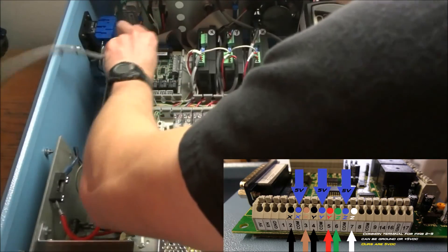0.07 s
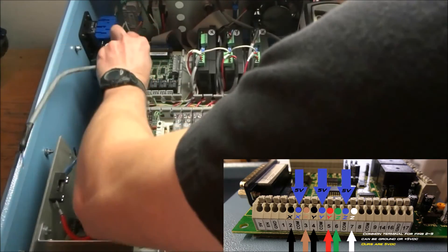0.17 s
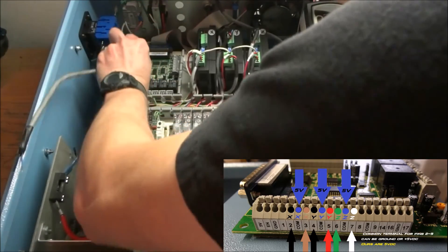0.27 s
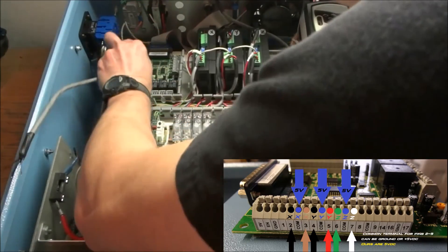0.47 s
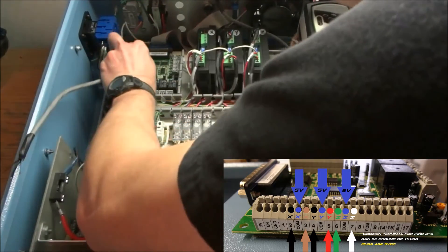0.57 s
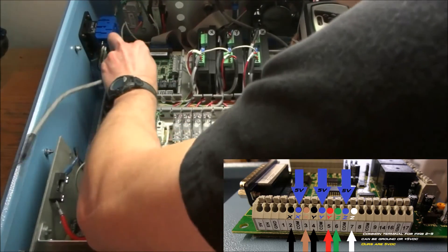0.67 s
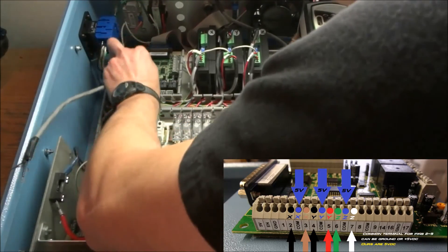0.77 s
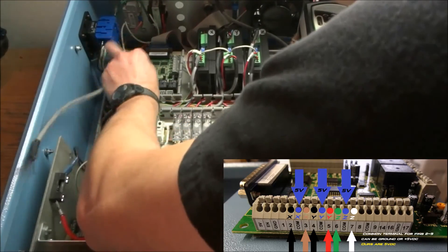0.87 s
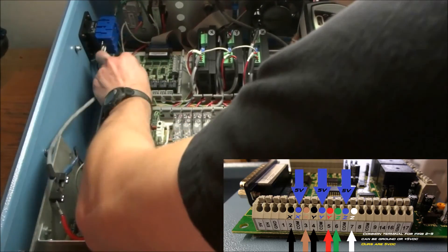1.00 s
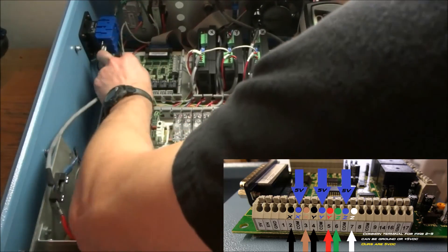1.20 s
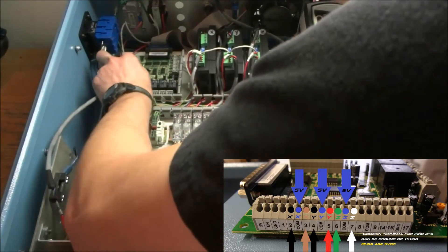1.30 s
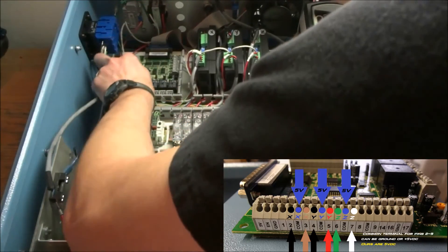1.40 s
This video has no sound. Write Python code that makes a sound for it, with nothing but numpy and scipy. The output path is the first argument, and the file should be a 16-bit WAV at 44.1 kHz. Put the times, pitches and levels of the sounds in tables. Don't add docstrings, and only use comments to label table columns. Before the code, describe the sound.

Metallic handling knocks inside a steel case: a brief scrape into a rattling slap, a pause, a single ringing knock, a sharp clicking snap, then small wire ticks, recorded close in a quiet, slightly reverberant room.

```python
import sys
import numpy as np
from scipy import signal
from scipy.fft import rfft, irfft, next_fast_len
from scipy.io import wavfile
from scipy.ndimage import map_coordinates

SR = 44100
rng = np.random.default_rng(int(sys.argv[2]) if len(sys.argv) > 2 else 0)


def int16_out(signal):
    q = np.round(np.clip(np.atleast_2d(signal).T, -1, 1) * 32767)
    wavfile.write(sys.argv[1], SR, q.astype(np.int16))


def nominal_scale(level):
    x = np.asarray(level, float) / 20
    return 10 ** x


N = 63945

LOW_HZ, HIGH_HZ = 1500, 7000
SIDE_DB, AIR_SIDE_DB = -17, -13

# (frequency [Hz], level [dB])
PRESSED_COLOUR = [(90, -30), (250, 3.5), (600, 2), (1000, -5), (1500, -11.5), (2500, -2.5), (7500, -8),
                  (11000, 8), (15500, -2.5)]
# (frequency [Hz], level [dB])
RAIL_COLOUR = [(90, -11), (300, -1), (700, 5.5), (1200, 6.5), (1600, 4.5), (2300, 8), (4700, 7),
               (8000, -11.5), (15500, -33)]


def unit(x):
    return x / np.sqrt(np.mean(x ** 2) + 1e-30)


def along(points, hz):
    f, v = np.transpose(points)
    return np.interp(np.log(hz + 1), np.log(f + 1), v)


def over_time(rows):
    return np.interp(np.arange(N) / SR, *np.transpose(rows))


def filtered(x, response):
    m = next_fast_len(x.shape[-1] + 8192)
    spectrum = rfft(x, m) * response(np.fft.rfftfreq(m, 1 / SR))
    return irfft(spectrum, m)[..., :x.shape[-1]]


def wobble(rate):
    knots = rng.standard_normal(int(N * rate / SR) + 4)
    return map_coordinates(knots, [np.arange(N) * rate / SR])


def noise(spectrum, side_db):
    closed = [(0.83, -120)] + list(spectrum) + [(spectrum[-1][0] * 2.5, -120)]
    mid, side = filtered(rng.standard_normal((2, N)), lambda hz: nominal_scale(along(closed, hz)))
    side = nominal_scale(side_db) * side
    return unit(np.array([mid + side, mid - side]))


def workshop():
    # (frequency [Hz], density [dB per Hz])
    air_colour = [(12, -10), (20, -9), (33, -4), (310, -11), (367, -9.5), (1440, -24.5), (1570, -20.5),
                  (1760, -22.5), (16000, -37)]
    # (frequency [Hz], density [dB per Hz])
    rumble_colour = [(20, -14), (40, 2.5), (70, -39), (105, 11), (170, -5.5), (260, -62)]
    # (time [s], rumble level [dB])
    lean_level = [(0, -86), (.14, -81), (.2, -56.5), (.55, -69), (.9, -62), (1.08, -49), (1.2, -68.5),
                  (1.45, -69)]
    whine_hz = 15720
    whine = nominal_scale(-84 + 2.3 * wobble(15)) * np.sin(2 * np.pi * whine_hz * np.arange(N) / SR)
    air = nominal_scale(-68) * noise(air_colour, AIR_SIDE_DB)
    rumble = nominal_scale(over_time(lean_level) + 0.44 * wobble(11.0)) * noise(rumble_colour, SIDE_DB)
    return air + rumble + whine


def room(x):
    t60, build_s = 0.6, 0.0092
    t = np.arange(SR // 2) / SR
    tail = rng.standard_normal((2, len(t))) * nominal_scale(-60 * t / t60) * (1 - np.exp(-t / build_s))
    tail = tail[0] + .26 * tail[1] * np.array([[1], [-1]])
    tail = filtered(tail, lambda hz: 1 / (1 + hz / 6000))
    return signal.fftconvolve(x, tail / np.linalg.norm(tail[0]), axes=1)[:, :N]


def rubbing():
    # (time [s], strength [dB])
    rub_level = [(0, -105), (.15, -79.5), (.3, -56.5), (.545, -68), (.565, -62.5), (.69, -59), (.74, -69),
                 (.92, -54.5), (1.2, -74), (1.33, -61.5), (1.45, -71)]
    # (frequency [Hz], density [dB per Hz])
    rub_colour = [(90, 5.5), (250, 3), (450, 4.5), (900, -10), (1500, -23.5), (3500, -23.5), (8000, -42)]
    # (frequency [Hz], density [dB per Hz])
    swish_colour = [(2500, 2), (5000, -14), (9000, -8), (13000, -2), (15500, -11)]
    swish_s, swish_wide_s = 0.21, 0.065
    bump = np.exp(-((np.arange(N) / SR - swish_s) / swish_wide_s) ** 2)
    swish = nominal_scale(-66) * bump * noise(swish_colour, AIR_SIDE_DB)
    lumps_db = 2.5 * wobble(44.85)
    return nominal_scale(4.5 + over_time(rub_level) + lumps_db) * noise(rub_colour, SIDE_DB) + swish


def steel_field(colour, life):
    # (frequency [Hz], t60 [s])
    steel_t60 = [(200, 0.56), (700, 0.46), (2500, 0.3), (6000, 0.25), (14000, 0.15)]
    # (frequency [Hz], level [dB])
    field_width = [(60, -32), (250, -32), (600, -8), (1500, -9), (5000, -10.5), (9000, -9), (14000, -14.5)]
    hz, t, z = signal.stft(rng.standard_normal((2, SR // 2)), SR, nperseg=256)
    t60 = np.clip(life * along(steel_t60, hz), .02, 1)
    z = z * nominal_scale(along(colour, hz)[:, None] - 60 * t / t60[:, None])
    z = z * [np.ones((len(hz), 1)), nominal_scale(along(field_width, hz))[:, None]]
    mid, side = signal.istft(z, SR, nperseg=256)[1][:, :SR // 2]
    return np.array([mid + side, mid - side])


def bands(x):
    def low(hz):
        return 1 / (1 + (hz / LOW_HZ) ** 6)

    def high(hz):
        return 1 / (1 + (HIGH_HZ / (hz + 1)) ** 12)

    def body(hz):
        return low(hz) / (1 + (170 / (hz + 1)) ** 6)

    parts = [filtered(x, f) for f in (body, lambda hz: 1 - low(hz) - high(hz), high)]
    return [p / np.abs(p).max() for p in parts]


def clear_mode(t, start_s, hz, db, t60, turn, swell_s):
    swell = (1 - np.exp(-t / swell_s)) ** 2
    flutter = np.interp(t * (25 + hz / 40), np.arange(256), rng.standard_normal(256))
    flutter_db = 3 * min(hz / 900, 1) * flutter
    phase = 2 * np.pi * (hz * (t + start_s) + turn) + flutter * min(hz / 2500, 1.3)
    return swell * nominal_scale(db - 60 * t / t60 + flutter_db) * np.sin(phase)


def struck(events, modes, colour, clear_db, dense_db, crack_db, thud_db, swell_cycles, life, order=2):
    out, t = np.zeros((2, N + SR)), np.arange(SR // 2) / SR
    turns, leans = rng.random(len(modes)), rng.uniform(-0.69, 1, len(modes))
    for s, mid_db, low_db, high_db, contact in events:
        contact = np.clip(contact, .0005, .04)
        force = (t / contact) ** order * np.exp(-4 * t / contact)
        push = rng.standard_normal(2048) * force[:2048]
        fed = np.sqrt(np.cumsum(force ** 2))
        levels = nominal_scale(np.array([low_db, mid_db, high_db]))

        dense = bands(steel_field(colour, life) * fed)
        dense_gains = levels * nominal_scale(np.array(dense_db)[[0, 1, 1]])
        sound = sum(g * b for g, b in zip(dense_gains, dense))

        rough = push * (1 + .2 * rng.standard_normal((2, 2048)))
        dry_crack = bands(filtered(rough, lambda hz: nominal_scale(along(colour, hz))))
        crack_gains = levels * nominal_scale([thud_db, crack_db, crack_db])
        sound[:, :2048] += sum(g * b for g, b in zip(crack_gains, dry_crack))

        start = round((s - order * contact / 8) * SR)
        for (hz, db, t60), turn, lean in zip(modes, turns, leans):
            t60 = min(t60, life * (.43 if hz < 1000 else .27))
            ring = clear_mode(t, start / SR, hz, db, t60, turn, swell_cycles / hz + contact / 2)
            gain = levels[np.searchsorted([LOW_HZ, HIGH_HZ], hz)] * nominal_scale(clear_db[int(hz > 2500)])
            sound += gain * ring * (1 + nominal_scale(SIDE_DB) * lean * np.array([[1], [-1]]))
        out[:, start:][:, :len(t)] += sound
    return out[:, :N]


def forearm_settle():
    # (time [s], mid level [dB], low level [dB], high level [dB], contact [s])
    settle_events = [
        (.862, -72, -42.5, -90, 0.022),
        (1.10, -63, -49.5, -86, 0.0197),
    ]
    # (frequency [Hz], level [dB], t60 [s])
    panel_modes = [(157, -11, 0.2), (288, 2.5, 0.51)]
    return struck(settle_events, panel_modes, PRESSED_COLOUR, clear_db=(-1.5, 0), dense_db=(-12, -12),
                  crack_db=-20, thud_db=-22, swell_cycles=1.9, life=2.1)


def wire_ticks():
    # (time [s], mid level [dB], low level [dB], high level [dB], contact [s])
    tick_events = [(.577, -66, -46, -80, 0.0086), (.621, -55.5, -85, -62, 0.0078),
                   (.653, -52.5, -50.5, -94, 0.004), (1.146, -52, -74, -52, 0.0021),
                   (1.2008, -37, -60, -50.5, 0.0026), (1.212, -47, -62, -62, 0.0142),
                   (1.253, -52, -51, -60, 0.0154), (1.319, -48, -40.5, -73, 0.0137),
                   (1.331, -72, -49, -61, 0.0115), (1.351, -65, -39.5, -64.5, 0.0061),
                   (1.427, -48.5, -66, -63.5, 0.004)]
    # (frequency [Hz], level [dB], t60 [s])
    plastic_modes = [(566, 1, 0.052), (3500, -2.5, 0.024), (5440, -2, 0.02)]
    # (frequency [Hz], level [dB])
    plastic_colour = [(150, -52), (450, 23.5), (900, 13), (2000, -7), (3300, -3), (7500, -14.5),
                      (15500, -31.5)]
    return struck(tick_events, plastic_modes, plastic_colour, clear_db=(-8, -6), dense_db=(-8, -8),
                  crack_db=-5, thud_db=-2.5, swell_cycles=1, life=0.61, order=.5)


def clamp_lever():
    # (time [s], mid level [dB], low level [dB], high level [dB], contact [s])
    lever_events = [
        (.9582, -31, -34.5, -35, 0.00356),
    ]
    # (frequency [Hz], level [dB], t60 [s])
    lever_modes = [(658, 2.5, 0.1), (564, 15.5, 0.033), (3050, 7, 0.051), (3710, 16.5, 0.028),
                   (5004, 5, 0.064)]
    return struck(lever_events, lever_modes, RAIL_COLOUR, clear_db=(-1, -8), dense_db=(-4, -5.5),
                  crack_db=1.5, thud_db=-34, swell_cycles=0.12, life=0.6)


def clamp_snap():
    # (time [s], mid level [dB], low level [dB], high level [dB], contact [s])
    snap_events = [
        (1.0158, -23.5, -22.5, -33, 0.0032),
        (1.032, -64, -32, -41.5, .006),
        (1.043, -40.5, -42.5, -61, 0.0026),
        (1.060, -35, -49, -71, .008),
    ]
    # (frequency [Hz], level [dB], t60 [s])
    rail_modes = [(298, -15.5, 0.46), (409, -5, 0.16), (591, 1.5, 0.092), (634, 5, 0.077), (737, 1.5, 0.1),
                  (858, -3.5, 0.056), (1125, -1, 0.14), (1347, -9, 0.14),
                  (2030, -4, 0.14), (2207, -12, 0.057), (2330, 3.5, 0.11), (2486, -12, .2),
                 (2820, -4.5, 0.13), (4231, -23, 0.071), (4720, -7, 0.19), (6920, 4, 0.018)]
    return struck(snap_events, rail_modes, RAIL_COLOUR, clear_db=(-7, -9), dense_db=(-3, -1.5),
                  crack_db=2, thud_db=0.5, swell_cycles=0.31, life=0.8)


def hand_press():
    # (time [s], mid level [dB], low level [dB], high level [dB], contact [s])
    press_events = [
        (.961, -34, -35, -60, 0.00503),
        (.974, -30.5, -38, -28.5, 0.0064),
        (.994, -31.5, -31.5, -34, 0.00444),
        (1.004, -54, -63, -53, 0.0036),
    ]
    # (frequency [Hz], level [dB], t60 [s])
    palm_modes = [(293, -2.5, 0.13), (363.4, -4.5, 0.21), (430, 8.5, 0.11), (715, -4, 0.13),
                  (1920, -11.5, 0.11), (2220, -14, 0.09), (2750, -6.5, 0.14), (3145, -5.5, 0.14),
                  (4020, 3, 0.072), (5150, -4, 0.12), (7340, 1.5, 0.11), (9600, -20, 0.038)]
    return struck(press_events, palm_modes, PRESSED_COLOUR, clear_db=(-4, -12), dense_db=(-5, -5),
                  crack_db=0, thud_db=-18, swell_cycles=0.46, life=0.96)


def cable_scrape():
    # (time [s], mid level [dB], low level [dB], high level [dB], contact [s])
    scrape_events = [
        (.146, -59, -55, -78, 0.011),
        (.165, -46.5, -42, -80, 0.017),
        (.188, -42.5, -27, -50.5, 0.002),
        (.205, -51, -30.5, -66, 0.0088),
        (.216, -39, -27, -64, .005),
        (.406, -42, -55, -72, 0.0043),
        (.929, -46, -42.5, -53, 0.0156),
    ]
    # (frequency [Hz], level [dB], t60 [s])
    scrape_modes = [(266, 0, 0.12), (366, -8.5, .15), (860, 1.5, 0.074), (1056, -18, 0.039),
                    (2880, 3.5, 0.074), (3600, -9, .12), (4410, -10, 0.059), (5110, -4.5, 0.23)]
    # (frequency [Hz], level [dB])
    scrape_colour = [(90, -10.5), (250, -3), (600, -4.5), (1100, -6), (1800, -5), (3000, 15.5), (5000, 4.5),
                     (15500, -20)]
    return struck(scrape_events, scrape_modes, scrape_colour, clear_db=(-12, -12), dense_db=(-3, -3),
                  crack_db=-7.5, thud_db=-7, swell_cycles=0.36, life=1.0, order=1)


def corner_knock():
    # (time [s], mid level [dB], low level [dB], high level [dB], contact [s])
    knock_events = [
        (.763, -29, -25.5, -30, 0.012),
    ]
    # (frequency [Hz], level [dB], t60 [s])
    corner_modes = [(270, -2, 0.2), (285.3, 0, 0.18), (362, -2, 0.33), (404, 8, 0.28), (509, -11, 0.06),
                    (668, -8, 0.37), (760, -2, 0.31), (1690, -11, 0.24), (2455, -10, 0.24),
                    (3080, -3, 0.25), (3650, -3, 0.3), (5035, -3.5, 0.21), (6000, -10, 0.25),
                   (7240, 4.5, 0.049), (10300, 11, 0.041)]
    # (frequency [Hz], level [dB])
    corner_colour = [(90, -28), (300, 5), (1000, -5.5), (1450, -6.5), (3500, 5), (7500, -6.5), (11000, 1.5),
                     (15500, -10.5)]
    return struck(knock_events, corner_modes, corner_colour, clear_db=(-5, -10),
                  dense_db=(-8, -7), crack_db=-2.5, thud_db=-53, swell_cycles=2.6, life=1.27)


def wall_slap():
    # (time [s], mid level [dB], low level [dB], high level [dB], contact [s])
    slap_events = [
        (.223, -24.5, -20.5, -23.5, 0.0069),
        (.235, -32.5, -35.5, -39, 0.0064),
        (.250, -33, -25, -35.5, .006),
        (.271, -33, -29.5, -35, 0.0077),
        (.300, -40.5, -48, -45, 0.0096),
    ]
    # (frequency [Hz], level [dB], t60 [s])
    wall_modes = [(222, -12, 0.25), (271.3, -0.5, 0.206), (368.3, -5, 0.28), (410.4, 0.5, 0.35),
                  (539, -14, 0.38), (677, 2, 0.23), (754, -4.5, 0.27), (861, -9.5, 0.32), (938, -8, 0.21),
                  (1056, -7, 0.3), (1191.4, -1.5, 0.35), (1250, -3, 0.17), (1660, 5.5, 0.077), (1940, 4, 0.1),
                  (2837, 0.5, 0.53), (2840, -6.5, 0.17), (4500, 2.5, 0.13), (6215, 6.5, 0.091),
                 (7770, 2, 0.12), (3565, -3.5, 0.16), (10300, 0.5, 0.2), (10920, 5, 0.048)]
    # (frequency [Hz], level [dB])
    wall_colour = [(90, -49.5), (200, -6), (400, 19.5), (1000, 13), (2500, 0.5), (5000, -7), (7500, -7.5),
                   (11000, 14.5), (15500, -9)]
    return struck(slap_events, wall_modes, wall_colour, clear_db=(-9, -15),
                  dense_db=(-9, -0.04), crack_db=-5, thud_db=-6.0, swell_cycles=0.52, life=1.01)


def scene():
    hits = forearm_settle() + wire_ticks() + clamp_lever() + clamp_snap()
    hits = hits + hand_press() + cable_scrape() + corner_knock() + wall_slap()
    return hits + nominal_scale(-21.5) * room(hits) + rubbing() + workshop()


def band_limit(x):
    return signal.sosfilt(signal.butter(12, 16760, fs=SR, output="sos"), x)


def record(dry):
    top_hz, steepness = 15850, 70
    mix = filtered(dry, lambda hz: 1 / (1 + (hz / top_hz) ** steepness))
    return band_limit(mix)


dry = scene()
out = record(dry)
int16_out(out)
```